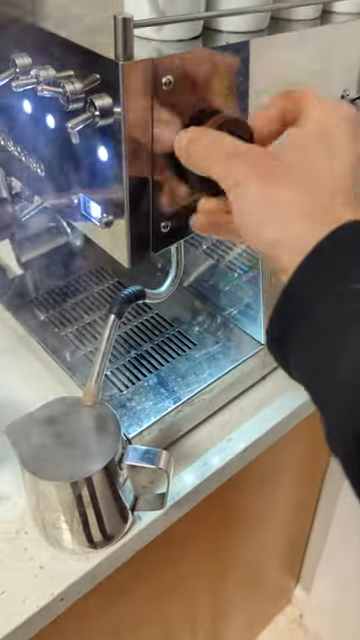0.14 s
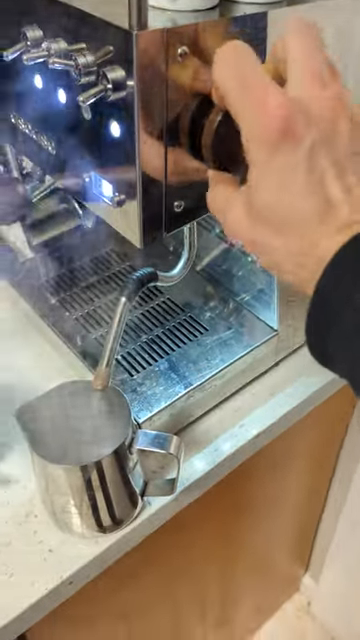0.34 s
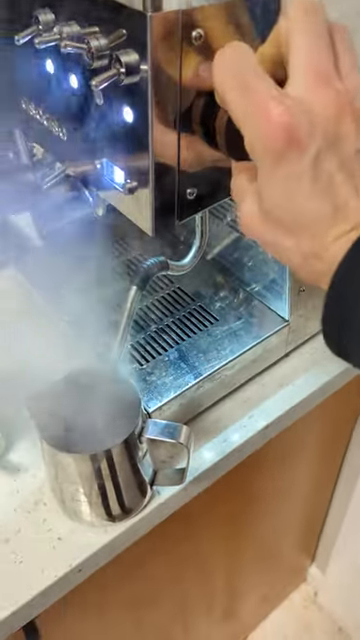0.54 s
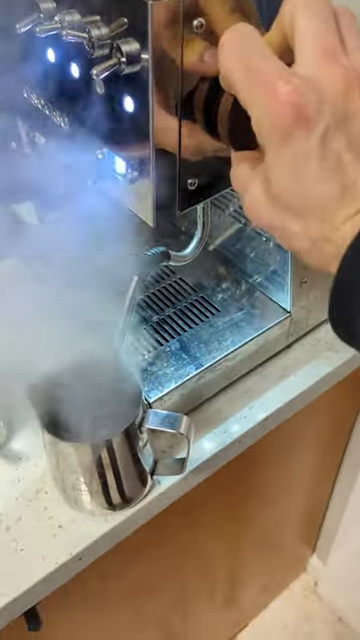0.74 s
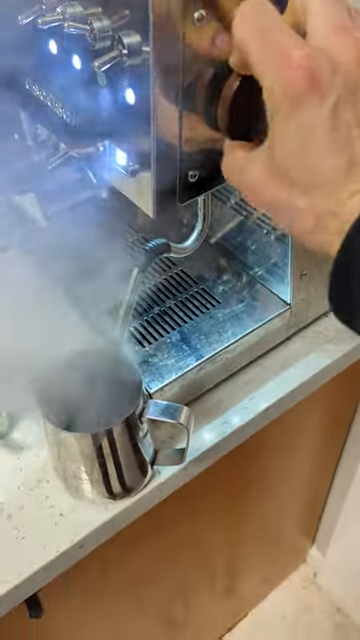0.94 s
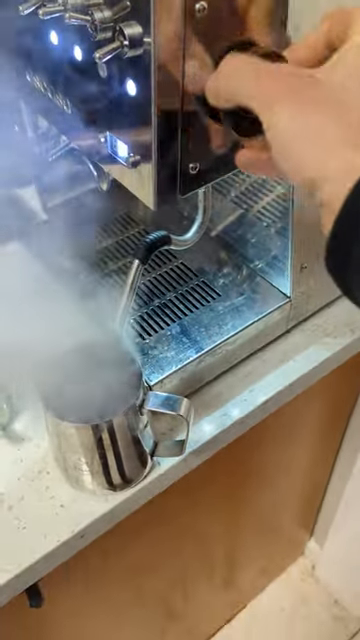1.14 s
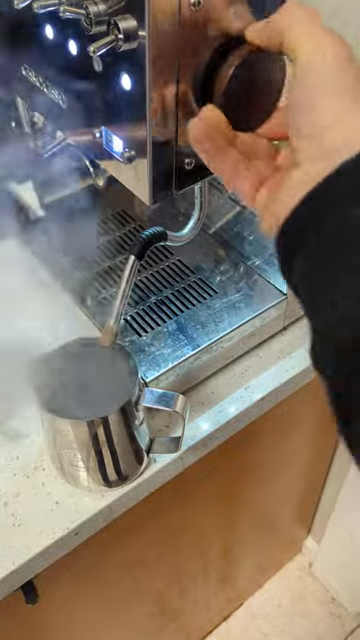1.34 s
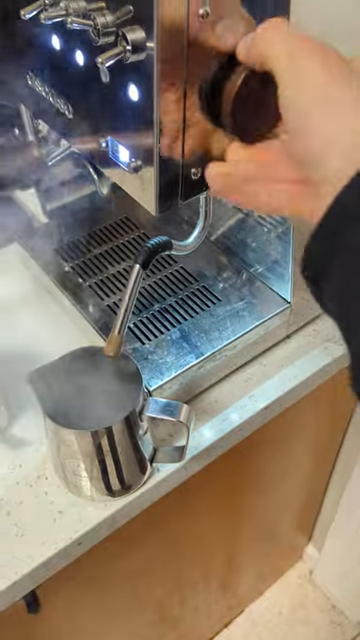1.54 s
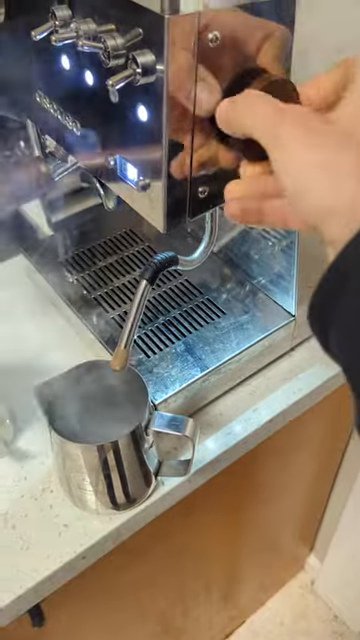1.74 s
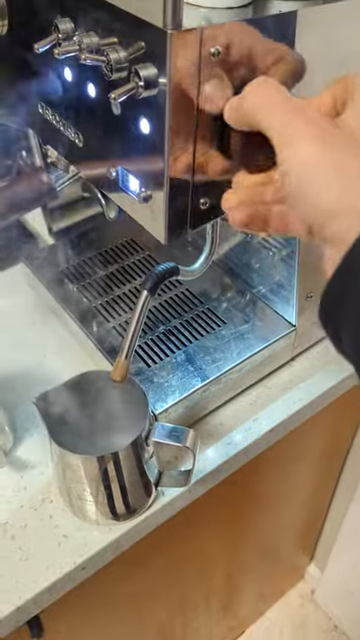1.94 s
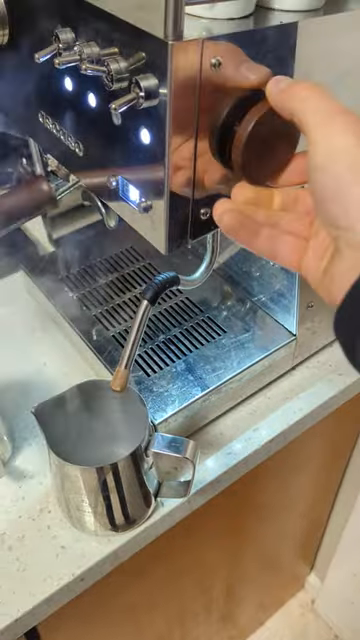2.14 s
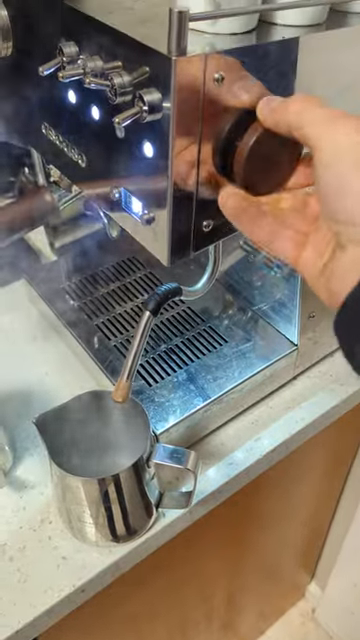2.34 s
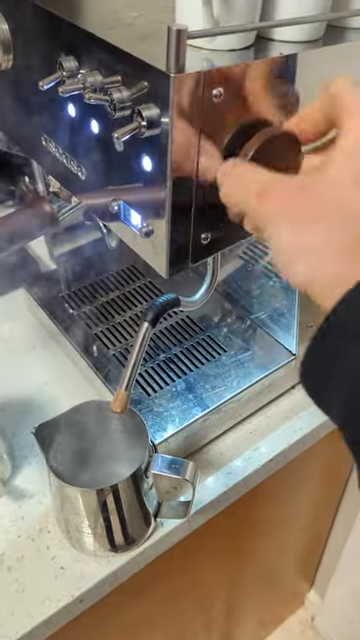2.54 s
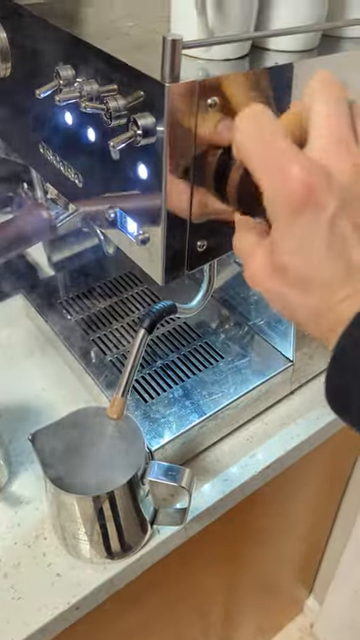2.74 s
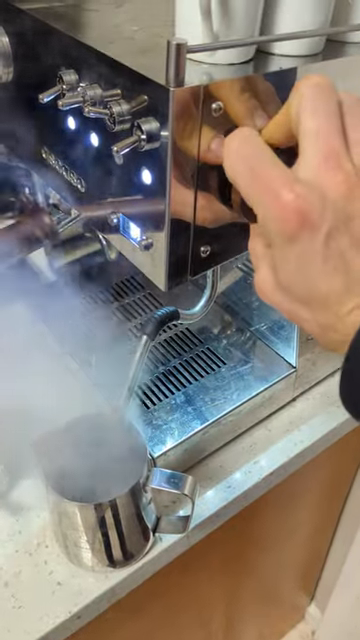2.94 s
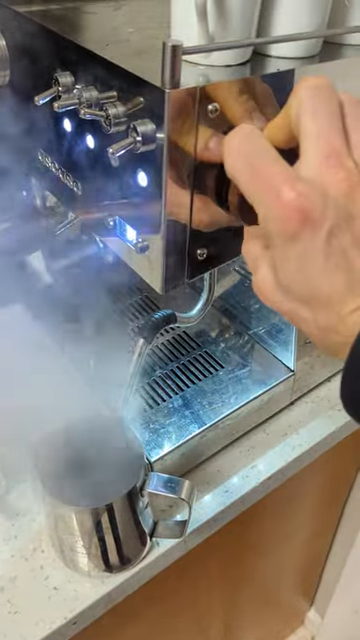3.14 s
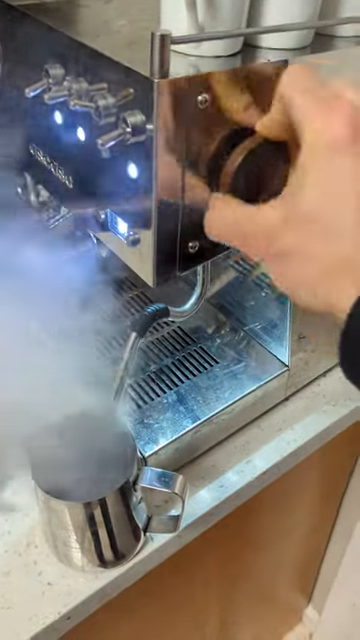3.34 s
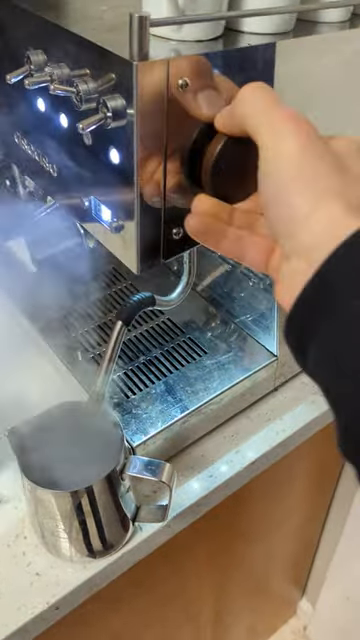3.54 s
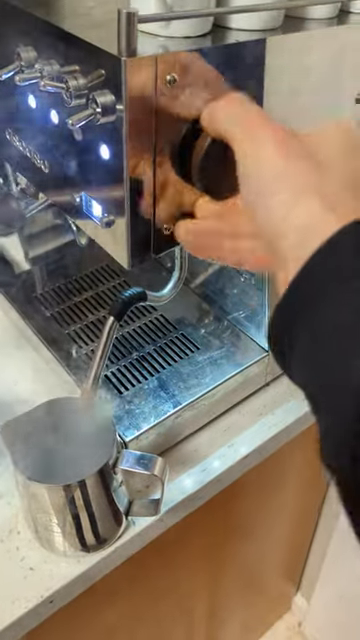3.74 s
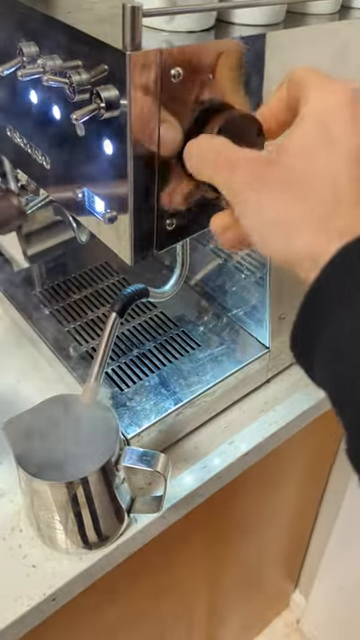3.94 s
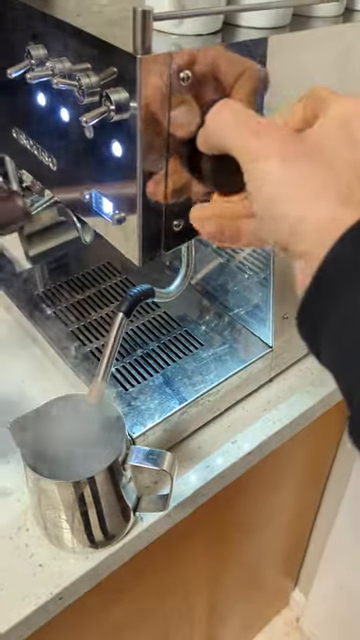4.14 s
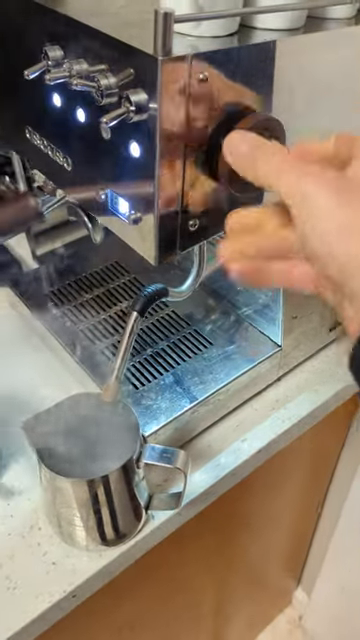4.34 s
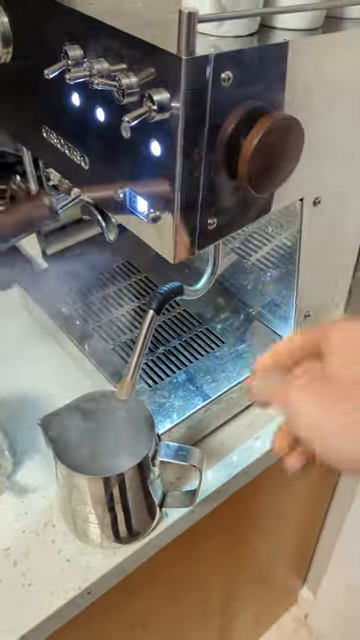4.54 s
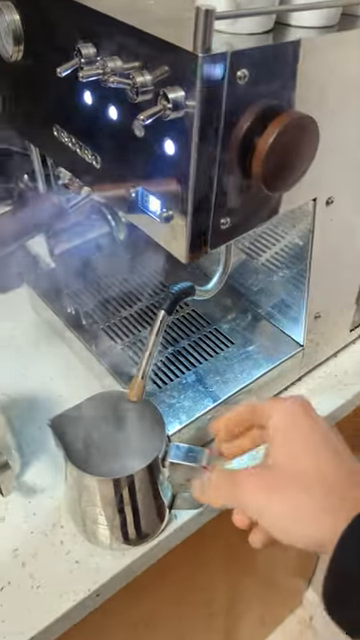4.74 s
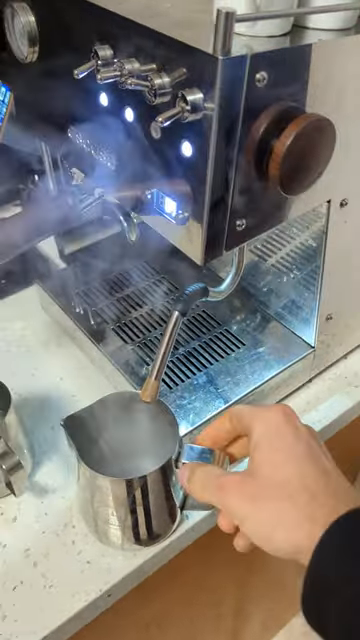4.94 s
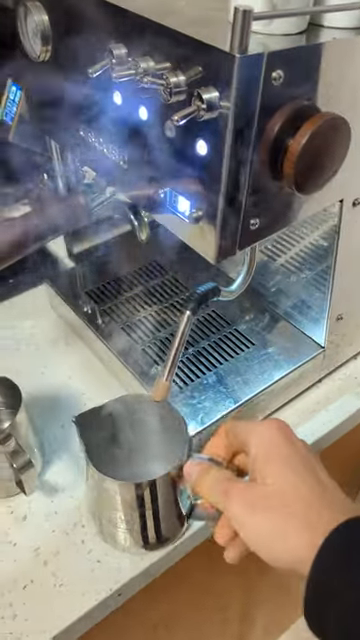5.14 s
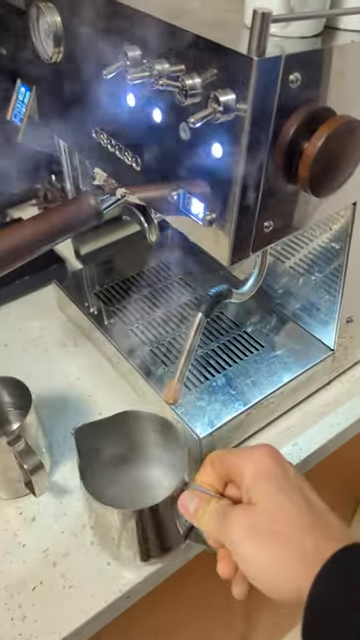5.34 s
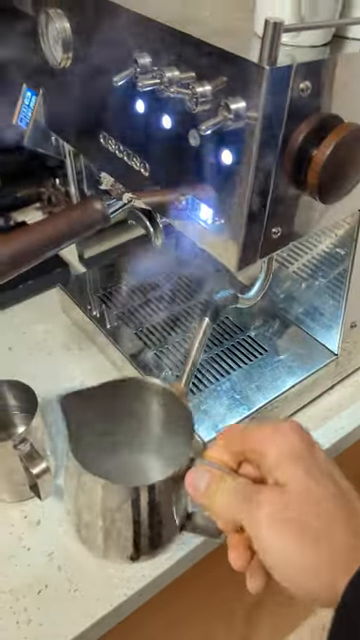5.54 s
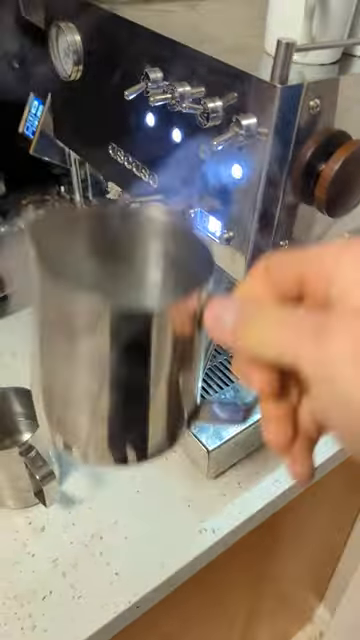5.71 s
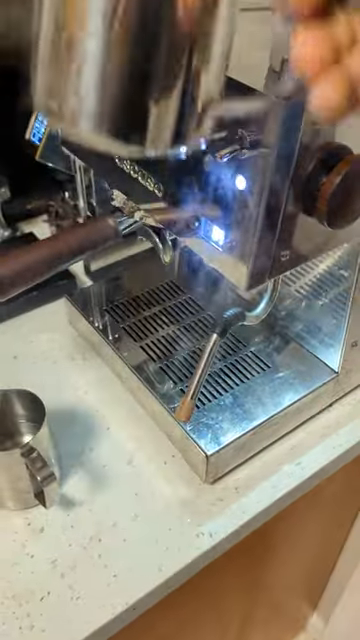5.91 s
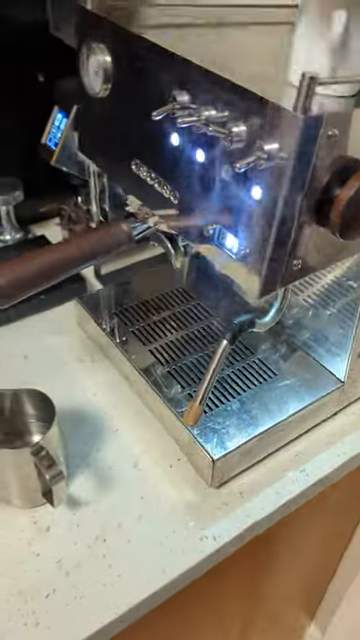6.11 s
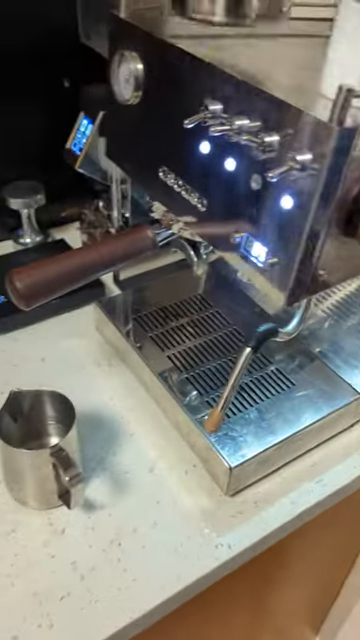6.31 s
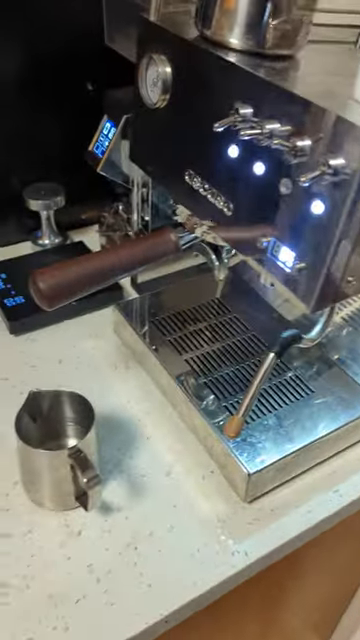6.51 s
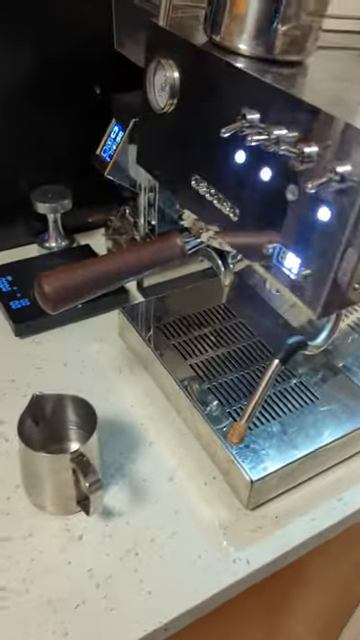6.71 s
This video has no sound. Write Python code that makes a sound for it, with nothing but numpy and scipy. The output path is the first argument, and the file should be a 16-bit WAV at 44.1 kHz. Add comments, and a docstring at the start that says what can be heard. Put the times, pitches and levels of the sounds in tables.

```python
"""In a kitchen, close by, an espresso machine's steam wand is purged twice into an empty steel pitcher.
Each blast is shaped noise: a hiss at the nozzle, a rush on the steel and the pitcher's hollow resonances.
The valve seeps throughout and whistles thinly after the second blast; the pump knocks about twice a second.
Fingers work the knob and, at the end, the pitcher lands on the machine: noise bursts with steel modes.
Soft room noise lies under it all, and a faint low drone comes and sinks away."""
import sys
import numpy as np
from scipy import signal
from scipy.fft import rfft, irfft, next_fast_len
from scipy.io import wavfile
from scipy.ndimage import uniform_filter1d

SR = 44100
rng = np.random.default_rng(int(sys.argv[2]) if len(sys.argv) > 2 else 0)


def inscribe(sig):
    """Save sig as 16-bit PCM at rate SR to the path in sys.argv[1].

    A 1-D sig is mono; a 2-D sig holds one channel per row.
    Samples are clipped to [-1, 1] before scaling.
    """
    pcm = np.round(np.clip(np.atleast_2d(sig).T, -1, 1) * 32767)
    wavfile.write(sys.argv[1], SR, pcm.astype(np.int16))


N = 302967
TIME = np.arange(N) / SR

# Spectra give relative colour only: each coloured noise is then scaled to rms 1.
# room noise spectrum: f/Hz, level/dB
KITCHEN_COLOUR = [(21, -30.5), (35, -8), (52, 3.5), (95, 1), (205, -11.5), (233, -8.5), (272, -12),
                  (431, -9.5), (503, -12.5), (819, -13.5), (930, -13.5), (1300, -22.5), (2460, -26.5),
                  (4920, -43.5), (7420, -33.5), (16000, -40.5)]
ROOM_DB = -58
# a faint low drone that sinks in pitch; its overtones fade as it goes
DRONE_START_S, DRONE_LENGTH_S, DRONE_DB = 3.6, 1.73, -53.5
DRONE_HZ, DRONE_SAG_HZ_PER_S2, DRONE_DULLING_DB_PER_S = 95.4, 3.8, 4.5

SEEP_DB = -73.5  # steady leak of the valve
# surges of the leak: middle t/s, half length/s, level/dB
SEEP_SURGES = [(1.898, 0.87, -79), (4.15, 0.5, -67.5), (4.542, 0.087, -52), (5.4, 0.32, -70.5),
               (6.87, 0.13, -58)]
# leak spectrum: f/Hz, level/dB
SEEP_COLOUR = [(1470, -3), (2500, -2.5), (3310, -3.5), (5310, -12), (7190, -4.5), (8020, -17.5),
               (8870, -12.5), (11900, -24), (13600, -25), (15000, -28), (16000, -32.5)]
# thin whistles of the leak, gliding up: start t/s, length/s, start f/Hz, end f/Hz, level/dB
WHISTLES = [(3.96, .17, 6950, 7150, -69), (4.2, .2, 7220, 7550, -69), (6.6, .25, 6620, 7400, -64.5)]

# fingers on the valve knob: t/s, relative level/dB, treble/dB
KNOB = [(0.004, -43, -1), (1.567, -41.5, -10), (1.593, -39.5, -4), (1.629, -38.5, -0.5), (1.667, -42, 4),
        (2.122, -37, -19), (2.164, -39.5, 5.5), (2.243, -45, -3), (2.573, -43, 3.5), (2.594, -43.5, 5),
        (2.633, -41.5, 0), (2.658, -39, 3.5), (3.796, -43, 12.5), (3.829, -37.5, -2), (4.381, -41, 2),
        (4.413, -39, -3)]
# knob spectrum: f/Hz, level/dB
KNOB_COLOUR = [(59, -50.5), (100, -10), (189, -4.5), (662, -7), (910, -28), (1010, -15.5), (2270, -7),
               (3700, -18.5), (4670, -20), (6020, -42.5), (6990, -27), (7940, -36), (16000, -47)]

# spits of condensate at the nozzle: t/s, level/dB, treble/dB
SPITS = [(0.175, -48, 0.5), (.202, -32, -18), (0.218, -38.5, 11.5), (0.236, -30.5, 5.5), (0.337, -57, 10),
         (2.694, -39, 9), (3.612, -32.5, 5), (3.667, -32, 10.5), (3.727, -36.5, 9)]
# spit spectrum: f/Hz, level/dB
SPIT_COLOUR = [(180, -52.5), (300, -15), (978, -20.5), (1900, -4), (2650, -16.5), (3290, -13),
               (8220, -18.5), (10600, -18), (16000, -21)]

# pump pulses: t/s, level/dB
PUMP_PULSES = [(.281, -28.5), (.766, -32.5), (1.25, -31.5), (1.763, -30.5), (2.297, -32), (2.817, -29.5),
               (3.383, -31.5), (3.931, -31), (4.5, -32.5), (5.064, -32.5), (5.663, -31.5), (6.263, -31.5),
               (6.864, -30)]
# piston blows within a pulse: t after the knock/s, relative level/dB, treble/dB, rise/s
PISTON_BLOWS = [(-.015, -5.5, -2, .011), (0, -2.5, 2.5, .003), (.017, -4, -6, .003), (.03, -7, -6, .002),
                (.072, -10, -3, .002)]
# piston spectrum: f/Hz, level/dB
PUMP_COLOUR = [(71, -39), (120, -10), (184, -13), (236, -18), (321, -15), (473, -11), (856, -19),
               (1190, -10), (1370, -21.5), (1980, -12.5), (3110, -20.5), (3660, -23.5), (8140, -36),
               (8840, -30), (16000, -47)]
# modes of the casing: f/Hz, relative level/dB, t60/s
CASING_MODES = [(177.6, -5, 0.56), (470, -1.5, 0.26), (586.3, -3, 0.16), (927, -8, 0.12),
                (1201, -8.5, 0.18), (1980, -6, .2), (2450, -9, 0.33)]
# the frame's boom swells after each knock, then dies; its level is relative to the pulse
BOOM_HZ, BOOM_DB, BOOM_RISE_S, BOOM_T60_S = 61, -6.5, .09, .31

# steam blasts: valve opens t/s, time to half strength/s, valve shuts t/s, level before balance/dB,
# sag while open/dB per s, fall once shut/dB per s
BLASTS = [(.312, .29, 1.258, -9.5, 7.5, 224.5), (2.668, 0.11, 3.483, -16.8, 0, 144)]
# pitcher hollow in each blast, swelling when the steam is wet: t/s, level before balance/dB
HOLLOW_LEVEL = [
    [(0.33, -53), (0.354, -43.5), (0.544, -29.5), (0.684, -32), (0.694, -33.5), (0.912, -28),
     (0.928, -31.5), (0.976, -29.5), (1.12, -34.5), (1.178, -34), (1.338, -41.5), (1.48, -69)],
    [(2.64, -60), (2.658, -46), (2.698, -47.5), (2.788, -32), (2.882, -35.5), (2.924, -45), (3.186, -33.5),
     (3.256, -34), (3.32, -43.5), (3.466, -29.5), (3.54, -47), (3.8, -56.5)],
]
# resonances of wand and nozzle: f/Hz, width/Hz, lift in first blast/dB, lift in second blast/dB
NOZZLE = [(2490, 900, -1.5, 0.5), (4070, 700, -2.5, 0), (6900, 510, 3.5, 0.5), (7160, 820, 2.5, 3),
          (8790, 320, 8, 7.5), (9510, 870, 10.5, -0.5), (10540, 880, 10.5, 0), (11530, 330, 10, 13),
          (12350, 400, 11, 2.5), (15000, 1600, 5, 5)]
# air resonances of the pitcher: f/Hz, width/Hz, lift in first blast/dB, lift in second blast/dB
PITCHER_AIR = [(330, 80, -0.5, 0.5), (420, 98, 8, 12.5), (613, 70, 15.5, 14), (674.6, 92, 13.5, 14),
               (772, 23, 11, 9.5)]
# spectrum of the hiss at the nozzle: f/Hz, level/dB
JET_COLOUR = [(4500, -28.5), (5800, -16), (6500, 5.5), (8000, -2.5), (9500, 1.5), (13000, 0), (15700, 1)]
# spectrum of the rush on the steel: f/Hz, level/dB
RUSH_COLOUR = [(500, -42), (850, -11), (938, -27), (1220, -8.5), (2140, 0.5), (2540, -1.5), (2850, 0.5),
               (3070, -3.5), (3470, -1), (3760, -5.5), (4360, -0.5), (4620, -4.5), (5310, -1.5), (5670, -9),
               (6000, -7.5), (7800, -37.5), (13200, -120)]
# spectrum of the blown hollow: f/Hz, level/dB
HOLLOW_COLOUR = [(70, -22), (110, -7), (200, -11), (300, -3.5), (600, -7), (800, -7.5), (1100, -3.5),
                 (2000, -32.5)]
# stereo placing of the steam: f/Hz, left minus right level/dB
STEAM_SIDE = [(60, -16.5), (110, 2), (200, 1), (380, -3.0), (700, -7), (1290, 11), (2380, -1), (4400, 7.5),
              (8120, -0.5), (15000, 2.5)]
JET_DB, RUSH_DB, HOLLOW_DB = 0.98, -1, 1  # balance of the three steam sounds
VALVE_CURVE = 1.37  # the gap widens slowly at first, as this power of time
VALVE_SHUT_S = 0.03  # how gradually the knob shuts
RUSH_WET_SHARE = 0.47  # how far the rush follows the hollow rather than the jet
HOLLOW_LAG_S = .00033  # the hollow reaches the right microphone late

# small sharp ticks: t/s, relative level/dB
TICKS = [(2.4658, -31), (4.173, -28), (4.3779, -38)]
# tick spectrum: f/Hz, level/dB
TICK_COLOUR = [(3000, -35), (7000, -6), (9500, -2), (12500, 1), (16000, -13)]

# the pitcher lands and rocks: t/s, level/dB, treble/dB
LANDING = [(6.448, -22, -13), (6.4557, -16.5, 3), (6.475, -21.5, -4.5), (6.568, -25.5, -22),
           (6.704, -56, -10)]
# landing spectrum: f/Hz, level/dB
LANDING_COLOUR = [(47, -44), (80, -9), (431, -6), (702, -2), (785, -7), (980, -10.5), (1860, -7),
                  (2270, -7), (2660, -6.5), (5170, -19.5), (5900, -19), (8050, -16), (10000, -14.5),
                  (14600, -20), (16000, -41)]
# modes of the pitcher and the steel top: f/Hz, relative level/dB, t60/s
STEEL_MODES = [(205, 9, .22), (255, 5.5, .2), (432, 4, .25), (645, 3, .25), (782, 2, .25), (1373, -9, .22),
               (1922, -3, .25), (2751, -3, .2), (4091, -15, .3), (5448, -13, .24), (5744, -11, .3),
               (6072, 0, .3), (6135, -3, .25), (10004, -6, .25)]

KNOCK_LAG_S = 8 / SR  # the machine's knocks reach the right microphone late
TOP_HZ = 16000  # upper edge of the finished sound


def amp(db):
    """Decibels to gain."""
    return 10 ** (np.asarray(db) / 20)


def curve(rows):
    """Join (t/s, value) points by straight lines in time."""
    return np.interp(TIME, *np.transpose(rows))


def along(points, hz):
    """Read (f/Hz, value) points on a log-frequency axis."""
    f, value = np.transpose(points)
    return np.interp(np.log(hz + 1), np.log(f), value)


def unit(x):
    """Scale a stereo pair so that its middle has rms 1."""
    return x / np.sqrt(np.mean(x.mean(0) ** 2))


def colour(x, points, peaks=(), side=None):
    """Filter a pair by a spectrum, resonant lifts and a left-right tilt."""
    hz = np.fft.rfftfreq(x.shape[1], 1 / SR)
    db = along(points, hz)
    for f, width, lift in peaks:
        db = db + lift / (1 + ((hz - f) / (width / 2)) ** 2)
    if side is not None:
        db = db + np.outer([.5, -.5], along(side, hz))
    return unit(irfft(rfft(x) * amp(db), x.shape[1]))


def noise(size, split_hz=500, likeness=0.16):
    """Noise at two close microphones: alike in the bass, less so above."""
    hz = np.fft.rfftfreq(size, 1 / SR)
    alike = likeness + (1 - likeness) / (1 + (hz / split_hz) ** 4)
    alike = np.clip(alike, 0, .995)
    mid, side = rfft(rng.standard_normal((2, size)))
    shared = mid * np.sqrt(1 + alike)
    opposed = np.outer([1, -1], side * np.sqrt(1 - alike))
    return irfft(shared + opposed, size)


def hiss(points, peaks=(), side=None, drive=1, likeness=0.069):
    """Coloured noise for the whole scene, its source scaled by drive."""
    size = next_fast_len(N)
    source = noise(size, likeness=likeness)[:, :N] * drive
    padded = np.pad(source, ((0, 0), (0, size - N)))
    return colour(padded, points, peaks, side)[:, :N]


def walk(rate, size=N):
    """Slow chance with a spread near 1, drawn afresh at rate per second and smoothed."""
    k = max(int(SR / rate), 1)
    steps = np.repeat(rng.standard_normal(size // k + 1), k)
    return 1.3 * uniform_filter1d(steps, k)[:size]


def arch(start, length):
    """Progress 0-1 through an event, and a rounded gain that is silent outside it."""
    progress = np.clip((TIME - start) / length, 0, 1)
    return progress, np.sqrt(4 * progress * (1 - progress))


def right_late(x, s):
    """Delay the right microphone of a pair."""
    return np.array([x[0], np.interp(TIME - s, TIME, x[1])])


def add(out, s, sound):
    """Mix a sound in at a time."""
    i = max(int(s * SR), 0)
    out[:, i:i + sound.shape[1]] += sound[:, :max(N - i, 0)]


def blow(points, treble_db, t60, room_db, room_t60, pan_db=0, rise=0.0024):
    """Dense modes of a struck thing and the kitchen's tail; the treble dies first."""
    t = TIME[:SR // 2]
    hz = np.fft.rfftfreq(len(t), 1 / SR)
    treble = amp(along([(500, 0.0017), (5000, treble_db)], hz))
    spectrum = rfft(colour(noise(len(t)), points)) * treble
    bands, out = np.geomspace(150, 14000, num=5), 0
    for centre, share in zip(bands, np.eye(len(bands))):
        # both decay times hold at 1 kHz and shorten as the band rises
        age = np.log(1000) * t * (centre / 1000) ** 0.19
        fade = np.exp(-age / t60) + amp(room_db) * np.exp(-age / room_t60)
        band = irfft(spectrum * along(np.c_[bands, share], hz), len(t))
        out = out + band * fade
    attack = 1 - np.exp(-t / rise)
    return out * attack * amp([[pan_db / 2], [-pan_db / 2]])


def ring(modes):
    """Decaying modes; the higher ones reach the two microphones out of step."""
    t, out = TIME[:SR // 2], 0
    for hz, db, t60 in modes:
        phase = rng.uniform(-1, 1, (2, 1)) * min(hz / 2000, 1)
        fade = np.exp(-np.log(1000) * t / t60)
        out = out + amp(db) * fade * np.sin(2 * np.pi * hz * t + phase)
    return out


def kitchen(waver_db=2.5):
    """Soft room noise, and a drone of three harmonics that comes and sinks away."""
    room = hiss(KITCHEN_COLOUR) * amp(ROOM_DB + 1.2 * walk(6.6))
    progress, gain = arch(DRONE_START_S, DRONE_LENGTH_S)
    age = progress * DRONE_LENGTH_S
    hz = (DRONE_HZ - DRONE_SAG_HZ_PER_S2 * age ** 2) * (1 + 0.0071 * walk(11))
    phase = 2 * np.pi * np.cumsum(hz) / SR
    drone = 0
    for k in range(3):
        level_db = waver_db * walk(7) - k * DRONE_DULLING_DB_PER_S * age
        drone = drone + amp(level_db) * np.sin((k + 1) * phase)
    return room + amp(DRONE_DB) * gain ** 2 * drone


def seep(waver=0.0037, flicker_db=2):
    """The valve leaks a little steam throughout, a hiss that surges, with thin whistles after the second blast."""
    leak = amp(SEEP_DB)
    for s, half, db in SEEP_SURGES:
        leak = leak + amp(db) * np.exp(-((TIME - s) / half) ** 2)
    out = hiss(SEEP_COLOUR) * leak
    unsteady, flicker = 1 + waver * walk(150), amp(flicker_db * walk(56))
    for s, length, start_hz, end_hz, db in WHISTLES:
        progress, gain = arch(s, length)
        hz = start_hz + (end_hz - start_hz) * np.sin(np.pi / 2 * progress) ** 2
        tone = np.sin(2 * np.pi * np.cumsum(hz * unsteady) / SR)
        out = out + amp(db) * gain * flicker * tone
    return out


def fingers(grit_db=2.0):
    """Fingers catch and slip on the knob: short noise bursts roughened by fast level chance."""
    out = np.zeros((2, N))
    for s, db, treble_db in KNOB:
        scrape = blow(KNOB_COLOUR, treble_db, t60=.16, room_db=-8, room_t60=.5, pan_db=1.2, rise=.003)
        grit = amp(grit_db * walk(290, size=scrape.shape[1]))
        add(out, s, amp(db - 5.0) * scrape * grit)
    return out


def spits():
    """Condensate spits from the nozzle around the valve's opening and shutting, as brief noise bursts."""
    out = np.zeros((2, N))
    for s, db, treble_db in SPITS:
        spit = blow(SPIT_COLOUR, treble_db, t60=0.026, room_db=-11.5, room_t60=0.41, pan_db=3.0)
        add(out, s, amp(db) * spit)
    return out


def pump(scatter_db=1.7, slack_s=.0008):
    """Each pulse is a few piston blows on the casing, then a boom as the frame takes up the shaking."""
    casing, out = ring(CASING_MODES), np.zeros((2, N))
    blows = []
    for lag, db, treble_db, rise in PISTON_BLOWS:
        sound = blow(PUMP_COLOUR, treble_db, t60=0.093, room_db=-10.0, room_t60=0.49, pan_db=2.5, rise=rise)
        blows.append((lag, amp(db) * sound))
    t = TIME[:SR // 2]
    dying = np.exp(-np.log(1000) * (t - BOOM_RISE_S) / BOOM_T60_S)
    shaking = np.minimum((t / BOOM_RISE_S) ** 2, dying)
    boom = amp(BOOM_DB) * shaking * np.sin(2 * np.pi * BOOM_HZ * t) * np.ones((2, 1))
    for s, db in PUMP_PULSES:
        # the blows never fall quite alike
        chances = rng.standard_normal((len(blows), 2))
        for (lag, sound), (late, hard) in zip(blows, chances):
            add(out, s + lag + slack_s * late, amp(db - 3.5 + scatter_db * hard) * sound)
        add(out, s + 0.018, amp(db - 7.5) * casing)
        add(out, s, amp(db) * boom)
    return out


def valve(opens, opening_s, shuts, db, sag, fall):
    """Jet strength: builds as the knob turns, sags with the boiler's pressure, dies as the wand empties."""
    age = np.maximum(TIME - opens, 0)
    gap = (age / opening_s) ** VALVE_CURVE
    since_shut = VALVE_SHUT_S * np.logaddexp(0, (TIME - shuts) / VALVE_SHUT_S)
    return gap / (1 + gap) * amp(db - sag * age - fall * since_shut)


def panels(x, wet_db=0.8):
    """Steel panels and the counter return the jet within milliseconds, combing each microphone differently."""
    t = TIME[:4096]
    echo = rng.standard_normal((2, len(t))) * np.exp(-t / .02) * (t > .001)
    echo *= amp(wet_db) / np.sqrt(np.sum(echo ** 2, axis=1, keepdims=True))
    echo[:, 0] = 1  # direct sound
    return unit(signal.oaconvolve(x, echo, axes=1)[:, :N])


def blast(strength, hollow_level, nozzle, air,
          flutter_db=0.63, sputter_db=2, drops_db=0.5, hollow_flutter_db=0.6):
    """A jet roughened by droplets hisses at the nozzle, rushes on the steel and blows the pitcher's hollow."""
    flow = amp(flutter_db * walk(45) + sputter_db * walk(350) + drops_db * walk(2500))
    sounding = (TIME >= hollow_level[0][0]) & (TIME <= hollow_level[-1][0])
    # a 10 ms slope softens both ends; abs guards the power below from rounding
    wet = amp(curve(hollow_level)) * np.abs(uniform_filter1d(sounding * 1., size=441))

    # the nozzle's resonances stand out only as the valve opens wide
    opening = np.sqrt(strength / strength.max())
    resonant = hiss(JET_COLOUR, nozzle, STEAM_SIDE, flow, likeness=0.68)
    plain = hiss(JET_COLOUR, drive=flow)
    jet = panels(np.sqrt(opening) * resonant + np.sqrt(1 - opening) * plain)

    rush = panels(hiss(RUSH_COLOUR, nozzle, STEAM_SIDE, flow, likeness=.7))
    rush_strength = strength ** (1 - RUSH_WET_SHARE) * wet ** RUSH_WET_SHARE

    hollow_flow = flow * amp(hollow_flutter_db * walk(40))
    hollow = hiss(HOLLOW_COLOUR, air, STEAM_SIDE, hollow_flow, likeness=.85)
    hollow = unit(right_late(hollow, HOLLOW_LAG_S))

    out = amp(JET_DB) * jet * strength
    out += amp(RUSH_DB) * rush * rush_strength
    return out + amp(HOLLOW_DB) * hollow * wet


def steam():
    """Two purges, each with its own valve movement and its own lifts of the nozzle and pitcher resonances."""
    out = np.zeros((2, N))
    for k, (row, hollow_level) in enumerate(zip(BLASTS, HOLLOW_LEVEL)):
        nozzle = [(hz, width, lifts[k]) for hz, width, *lifts in NOZZLE]
        air = [(hz, width, lifts[k]) for hz, width, *lifts in PITCHER_AIR]
        out += blast(valve(*row), hollow_level, nozzle, air)
    return out


def ticks():
    """Small sharp ticks: bright noise bursts that die very fast."""
    out = np.zeros((2, N))
    for s, db in TICKS:
        tick = blow(TICK_COLOUR, 0, t60=0.016, room_db=-23.5, room_t60=0.22, rise=0.00057)
        add(out, s, amp(db - 12.5) * tick)
    return out


def landing():
    """The pitcher lands and rocks on the machine's top: noise bursts, with ringing steel modes."""
    out, steel = np.zeros((2, N)), ring(STEEL_MODES)
    for s, db, treble_db in LANDING:
        thud = blow(LANDING_COLOUR, treble_db, t60=0.063, room_db=-10, room_t60=0.45, pan_db=2.0, rise=0.004)
        add(out, s, amp(db) * thud)
        # the brighter and louder the contact, the more the steel rings
        add(out, s, amp(db - 18 + treble_db) * steel)
    return out


def scene():
    """The machine's body stands a little to the left, so its knocks reach the right microphone late."""
    body = fingers() + pump() + ticks() + landing()
    return kitchen() + seep() + right_late(body, KNOCK_LAG_S) + spits() + steam()


def record(dry):
    """Thin the deepest bass, round rare peaks and cut the top steeply."""
    high_pass = signal.butter(4, 40, "highpass", fs=SR, output="sos")
    thin = signal.sosfilt(high_pass, dry)
    rounded = 1.15 * np.tanh(thin / 1.15)
    low_pass = signal.ellip(12, .1, 80, TOP_HZ, fs=SR, output="sos")
    return signal.sosfilt(low_pass, rounded)


dry = scene()
out = record(dry)
inscribe(out)
```